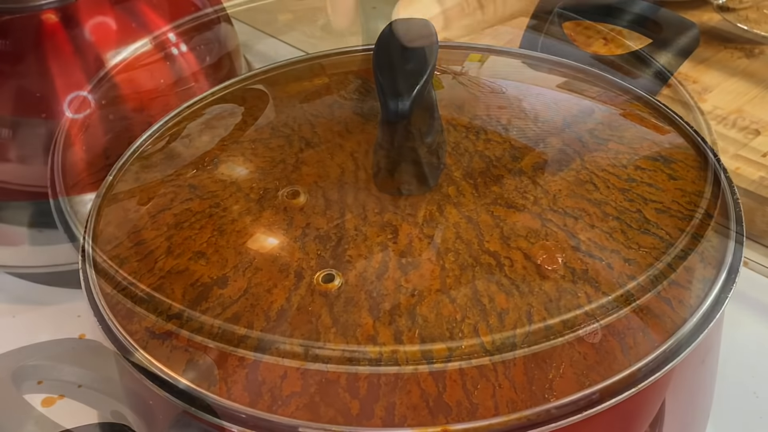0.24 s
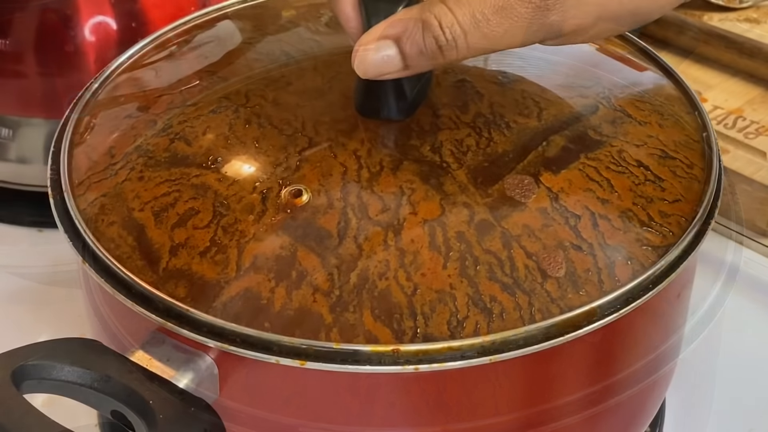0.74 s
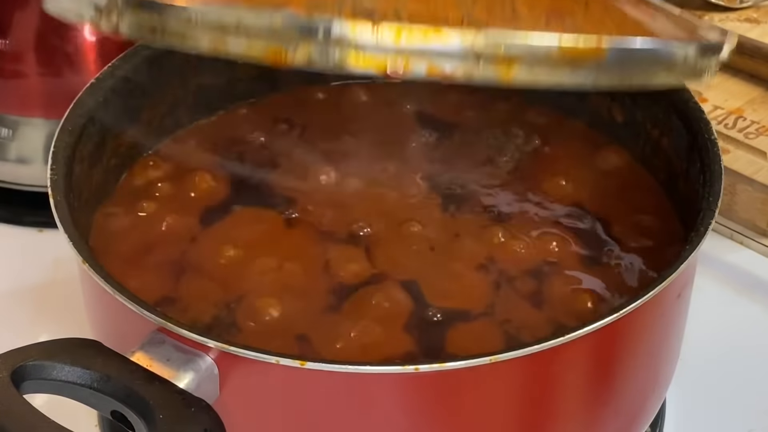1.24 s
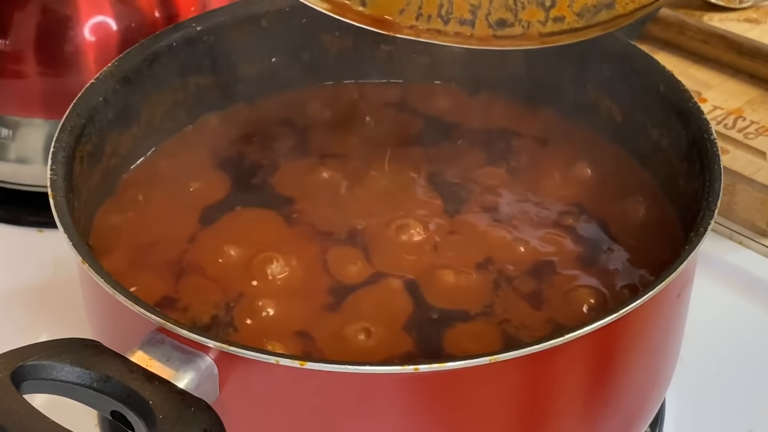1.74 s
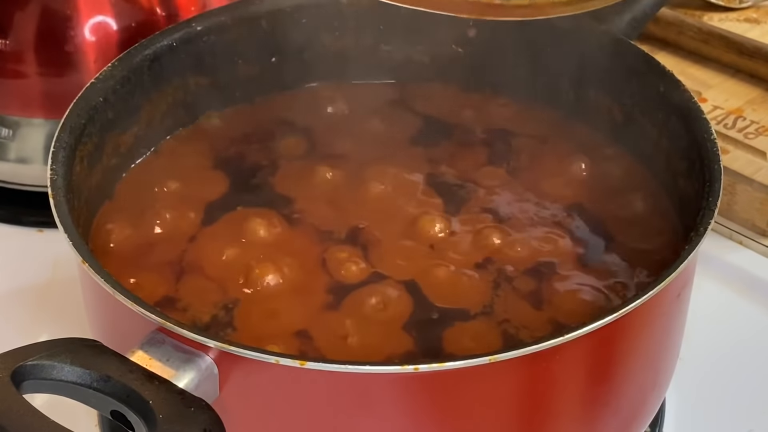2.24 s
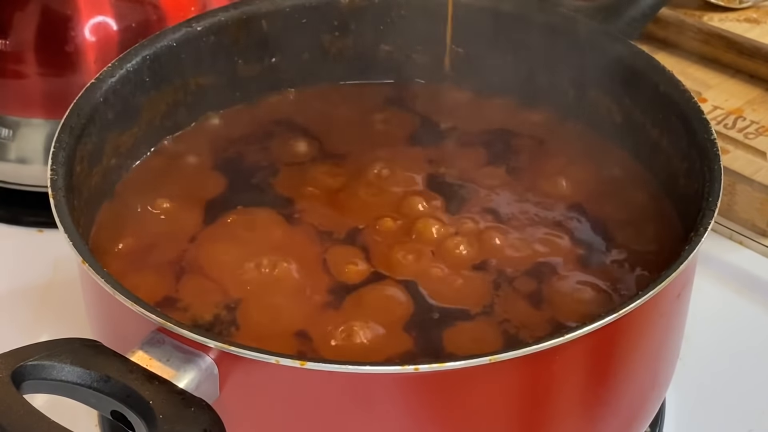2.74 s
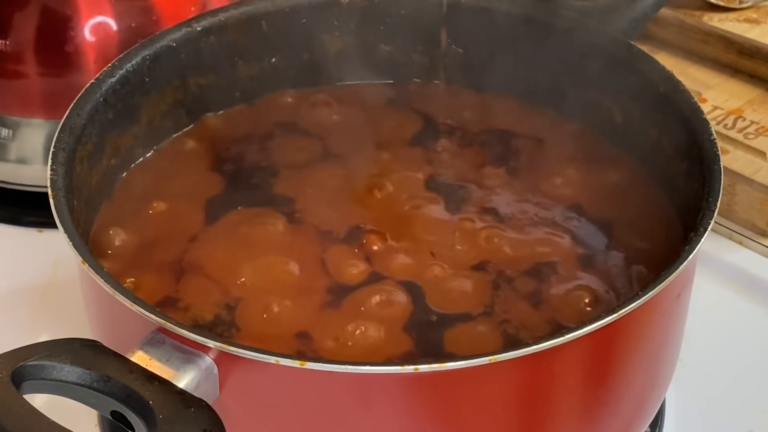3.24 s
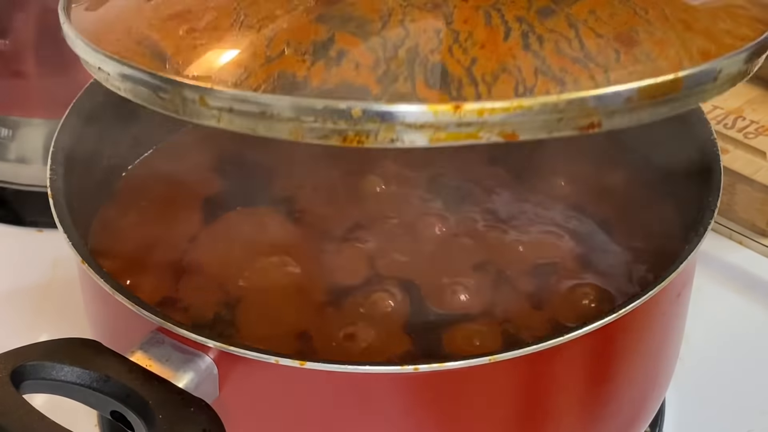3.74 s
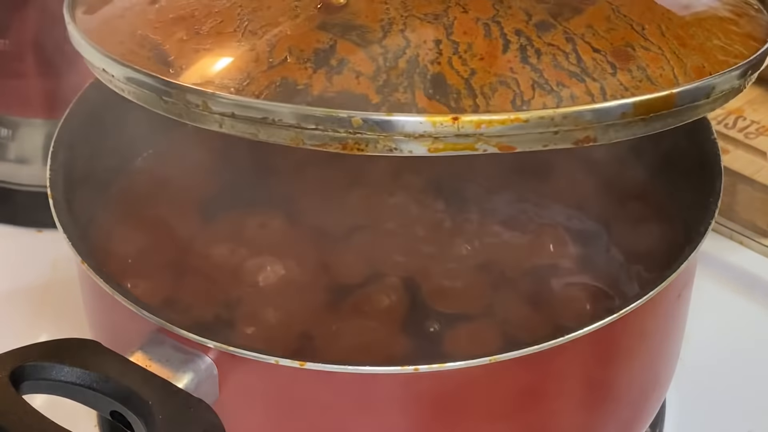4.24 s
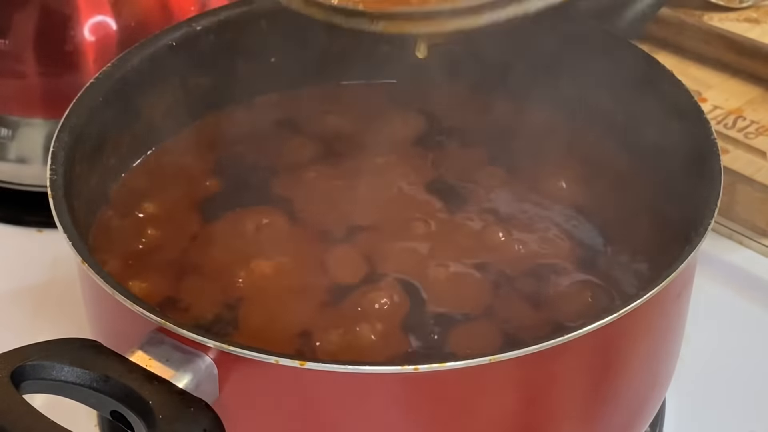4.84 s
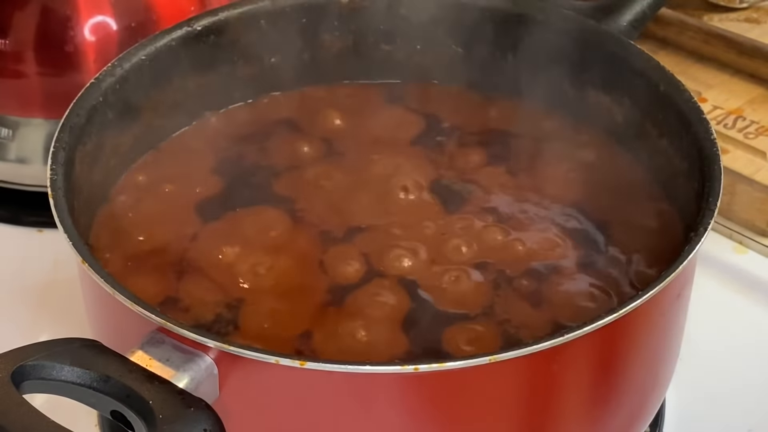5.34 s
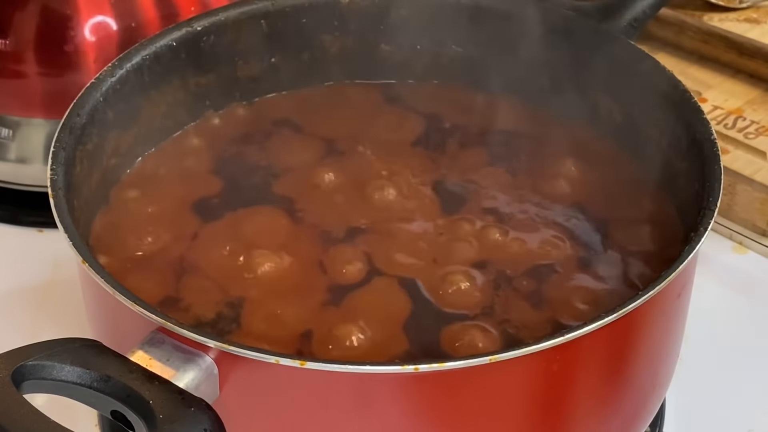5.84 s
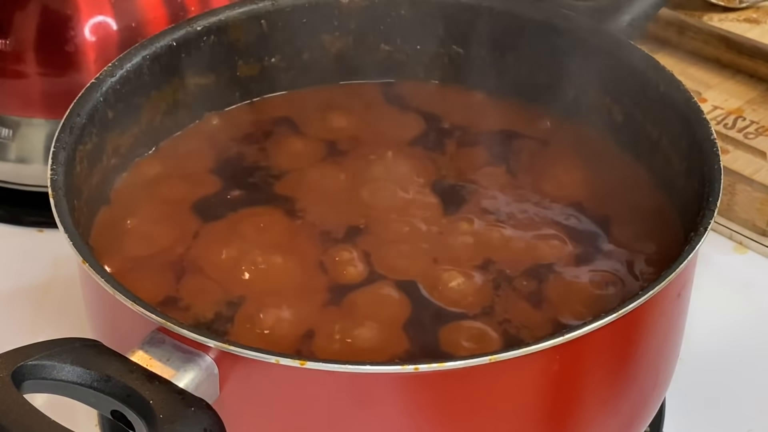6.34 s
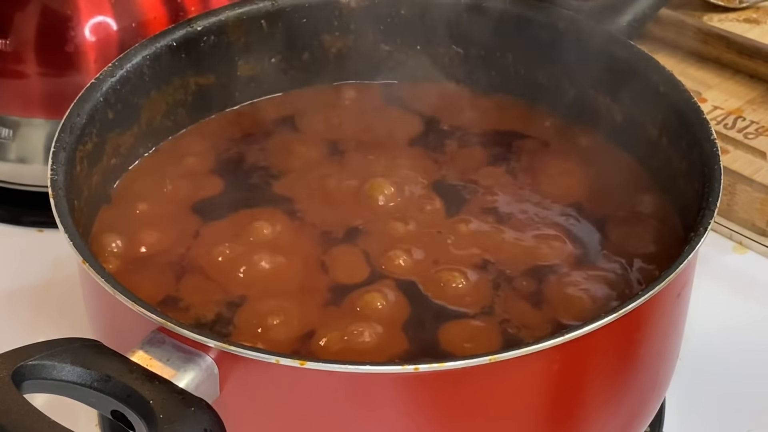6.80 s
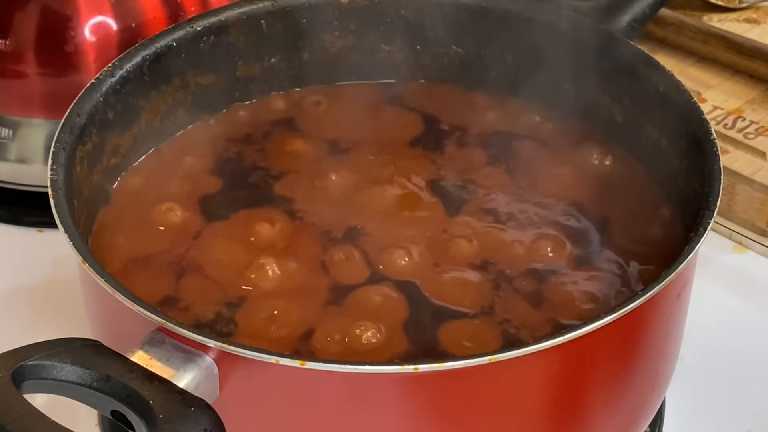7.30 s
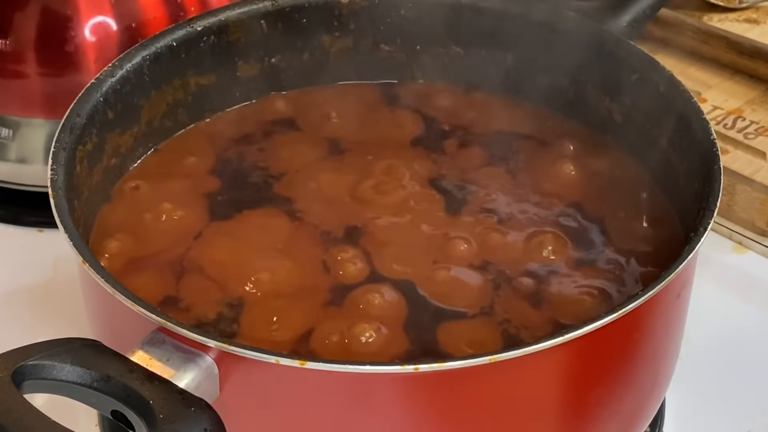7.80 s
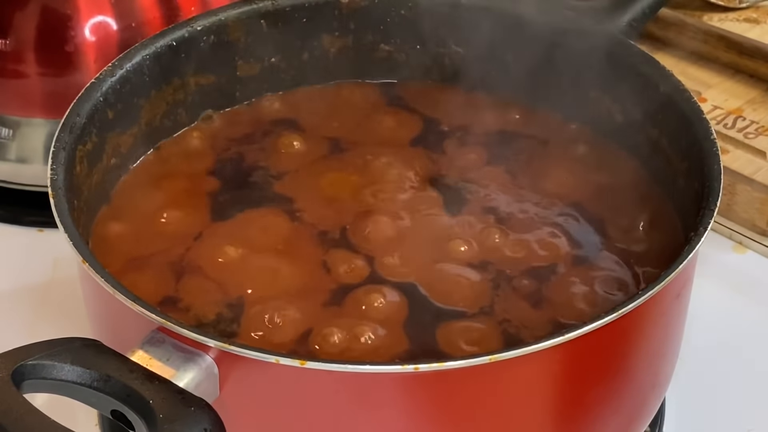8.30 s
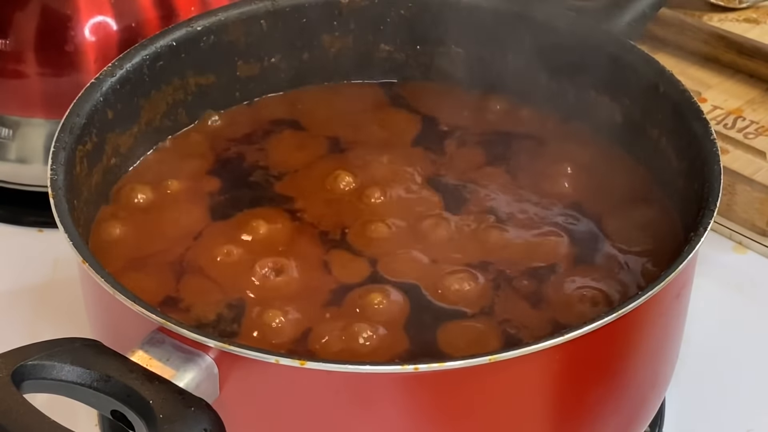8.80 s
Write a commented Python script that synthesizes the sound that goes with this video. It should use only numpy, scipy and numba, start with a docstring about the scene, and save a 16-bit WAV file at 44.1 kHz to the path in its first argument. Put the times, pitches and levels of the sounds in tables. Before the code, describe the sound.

Close stereo phone pickup of thick stew boiling on a stove. First almost only a quiet fan hum and light finger touches, then the lid opens and a bright, wet, spitting fizz appears at once, dotted with loud pops and deeper plops. Farther off, with a little room echo, the glass lid bumps the worktop several times, ending in a loud rattling clatter that stops quickly. Fizzing and popping continue to the end.

```python
"""Kitchen stove: a thick stew boils in a pot, close to a phone with two microphone ports.
A hand lifts the glass lid: the air space under it sings upward and fizz, pops and plops come out.
Later the lid clatters onto the worktop; a fan motor hums all along.
Bubbles are swelling sines of rising pitch, spray and skins noise bursts, bright ticks clicks with
noise, the lid a bank of struck modes, the hand and air filtered noise."""
import sys
import numpy as np
from scipy import signal
from scipy.fft import rfft, irfft
from scipy.io import wavfile
from scipy.ndimage import uniform_filter1d
from numba import njit

SR = 44100
rng = np.random.default_rng(int(sys.argv[2]) if len(sys.argv) > 2 else 0)


def invert_db(x):
    """Field ratio 10**(x/20) for x, a level in decibels (scalar or array-like)."""
    u = np.asarray(x, float) / 20
    return 10 ** u


def output_pcm(signal):
    """Save a mono or channel-first signal as 16-bit PCM at the path in sys.argv[1].

    Samples are clipped to [-1, 1] before scaling.
    """
    pcm = np.clip(np.atleast_2d(signal).T, -1, 1) * 32767
    wavfile.write(sys.argv[1], SR, np.round(pcm).astype(np.int16))


N = 399546
TIME_S = np.arange(N) / SR
BIN_HZ = np.arange(N // 2 + 1) * SR / N

# boil escaping past the lid, shut at first, tipped back over the pot near 4 s: (time [s], fizz level [dB])
BOIL = [(0, -70), (.3, -78), (.96, -85), (1.01, -57), (1.4, -52), (3.4, -52), (4.2, -55), (4.9, -52.5),
        (7.4, -53.5), (8.3, -54), (9.06, -53.5)]
# fizz spectrum: (frequency [Hz], relative level [dB])
FIZZ_TONE = [(1500, -10), (2400, -13), (3000, -8.5), (3600, -3), (4200, -3.5), (5300, 1), (6800, 0),
             (9000, -4.5), (12000, -7), (15000, -19), (16500, -13)]
# loudest small bubbles bursting: (time [s], peak [dB], pitch [Hz])
POPS = [(1.2617, -36, 4820), (1.3391, -39, 5320), (1.4538, -33, 2930), (1.584, -31, 5310),
        (1.7227, -30.5, 3500), (1.7317, -29, 4100), (1.791, -42, 4370), (1.9068, -41, 5310),
        (1.9562, -25, 4270), (2.0125, -33, 4460), (2.0604, -31, 3650), (2.1667, -29.5, 5200),
        (2.263, -28.5, 5160), (2.3069, -36, 5300), (2.3323, -28, 6000), (2.3672, -38, 3840),
        (2.4171, -29.5, 5120), (2.4605, -30, 3640), (2.5782, -32, 5360), (2.6147, -38, 3720),
        (2.7144, -34.5, 3740), (2.7982, -32, 5440), (2.9728, -32, 4900), (3.2308, -39, 5240),
        (3.5271, -30, 5300), (3.5645, -28, 5130), (3.6538, -29, 3430), (3.9367, -30.5, 5250),
        (4.1741, -42, 4580), (4.5278, -33, 7000), (4.5473, -35.5, 3460), (4.7069, -37, 6200),
        (5.0821, -30, 6270), (5.1015, -32.5, 4250), (5.1444, -29.5, 5830), (5.3674, -29.5, 3500),
        (5.9196, -34, 4430), (5.9456, -28, 5530), (5.97, -34, 5240), (6.2714, -40, 5200),
        (6.3008, -35, 4200), (6.4001, -39, 6860), (6.625, -28, 3590), (6.9099, -38, 4140),
        (6.9518, -43, 5680), (7.2501, -46, 5300), (7.4537, -31.5, 5140), (7.5135, -34, 3630),
        (7.8464, -31, 5030), (8.1552, -39, 7290), (8.1796, -34, 6830), (8.4385, -34, 6370),
        (8.6371, -38, 4340), (8.7129, -26, 5600), (8.8596, -38, 4800), (9.0282, -30, 5600)]
# big bubbles breaking through the thick surface: (time [s], peak [dB], pitch [Hz])
PLOPS = [(1.29, -46.5, 1490), (1.453, -45, 2170), (1.502, -40, 1220), (1.58, -50, 1150), (1.689, -50, 930),
         (1.732, -43, 2400), (1.965, -41.5, 2380), (1.988, -48.5, 900), (2.045, -44, 910),
         (2.255, -44, 915), (2.363, -49.5, 920), (2.483, -50, 880), (2.567, -45, 2060), (2.607, -49, 720),
         (2.721, -47.5, 1220), (2.806, -48, 835), (2.93, -46, 1120), (2.978, -47, 1610), (3.0, -46, 1780),
         (3.049, -44, 890), (3.085, -48, 1320), (3.12, -39.5, 1840), (3.166, -42.5, 1290),
         (3.282, -44.5, 1040), (3.464, -48, 2050), (3.514, -42.5, 1960), (3.567, -49, 2080),
         (3.71, -45.5, 1490), (3.896, -48, 1260), (3.937, -42.5, 1900), (4.82, -49, 1630),
         (5.239, -51, 1270), (5.279, -46.5, 1350), (5.355, -48.5, 810), (5.565, -43, 1300),
         (5.714, -49, 1730), (5.928, -52, 930), (5.941, -46, 1180), (6.055, -47, 1170), (6.181, -51, 810),
         (8.1, -45.5, 890), (8.209, -48.5, 1230), (8.342, -43, 1210), (8.423, -42.5, 1310),
         (8.639, -44, 1340), (8.743, -51, 1360)]
# bright ticks and short hisses in the treble: (time [s], peak [dB], level above 12 kHz [dB])
BRIGHT_TICKS = [(1.3523, -48, -55), (1.6082, -42, -64), (1.7315, -41, -42), (1.8983, -46, -66),
                (1.9574, -40, -54), (1.9644, -50, -52), (2.1879, -48, -70), (2.2722, -46, -61),
                (2.7053, -46, -60), (2.7152, -42, -45), (2.7464, -38, -51), (2.798, -40, -48),
                (2.8823, -49, -48), (2.9282, -50, -60), (2.9664, -56, -57), (3.3174, -44, -55),
                (3.5633, -48, -63), (4.5775, -42, -68), (5.4947, -44, -71), (5.6845, -44, -69),
                (6.3061, -45, -60), (6.4457, -51, -53), (6.5728, -39.5, -62), (6.768, -39, -65),
                (6.7865, -47, -67), (7.0314, -48, -57), (7.1711, -44, -72), (7.2502, -38, -56),
                (8.0087, -45, -67), (8.1165, -43, -50), (8.357, -42.5, -72), (8.3993, -43, -65),
                (8.522, -48, -59), (8.8059, -46, -62), (9.0004, -45, -71)]
# spectrum of spray and bright ticks: (frequency [Hz], relative level [dB])
SPRAY_TONE = [(2000, -48), (4000, -39), (6000, 4), (9000, 7), (12000, -2.5), (15000, 2), (16500, -5)]
# lid meeting the worktop: (time [s], ring drive [dB], thud drive [dB], chatter t60 [s])
KNOCKS = [(5.625, -39, -54, 0.34), (6.314, -29.5, -28, 0.3), (6.357, -30.5, -29, 0.36),
          (6.405, -44, -31.5, 0.18), (6.477, -35, -31, 0.12), (6.518, -22.5, -26, 0.32),
          (6.535, -30, -29.5, 0.27), (6.617, -27, -32.5, 0.49), (6.863, -49, -43.5, 0.49),
          (6.952, -37.5, -44, 0.11), (6.974, -21.5, -30.5, 0.34), (7.409, -37, -30, 0.26),
          (7.566, -13, -18.5, 0.49), (7.577, -16.5, -13.5, .2), (7.625, -9, -28, 0.22),
          (7.655, -13.5, -28, .2), (7.676, -14.5, -24, 0.31), (7.707, -14, -27.5, 0.19),
          (7.732, -18, -21.5, 0.32), (7.993, -29, -53, 0.063)]
# modes of the lid: (frequency [Hz], relative level [dB], t60 [s])
LID_MODES = [(74.7, 4, 0.64), (98.2, -1.5, 0.23), (188.5, 1, 0.77), (263, 1.5, 0.26), (312, -13.5, 0.39),
             (380, 5.5, 0.091), (444, -1.5, 0.14), (470, -2, 0.17), (558, 6, 0.035), (625, -2.5, 0.26),
             (859, -11, 0.26), (954, -5, 0.17), (1053, -10, 0.14), (1355, -9, 0.2), (1440, -17, 0.17),
             (1558, -13, 0.15), (1810, 0, 0.029), (1810, -28, 0.21), (1996, -8, 0.054)]
# worktop response: (frequency [Hz], relative level [dB])
WORKTOP_TONE = [(25, -48), (45, 6), (65, -3), (190, 3), (480, -15.5), (780, -14.5), (1000, -10),
                (1250, -17), (1500, -13), (2200, -22), (3000, -26), (16000, -81)]
# spectrum of the lid's ticks and scratches: (frequency [Hz], relative level [dB])
SCRATCH_TONE = [(1500, -30), (2500, -7.5), (3600, 5.5), (6000, 2.5), (9000, -5), (12000, -11.5),
                (16000, -11)]
# fingers closing on the lid knob: (time [s], rustle drive [dB], tap drive [dB], t60 [s])
TOUCHES = [(0.4526, -52.5, -58, 0.12), (0.551, -50.5, -58, 0.056), (0.673, -40, -61.5, 0.023),
           (0.695, -48.5, -55, 0.11), (0.7632, -48, -70, 0.033), (0.793, -51, -58, 0.16),
           (0.8774, -48, -70, 0.11), (0.9204, -56, -64, 0.13)]
# spectrum of the touches: (frequency [Hz], relative level [dB])
KNOB_TONE = [(300, 4), (800, 6.5), (2000, -2), (4000, 5.5), (8000, -3.5), (12000, -12), (16000, -18)]
# air space under the rising lid: (time [s], pitch [Hz], level [dB])
GAP = [(.82, 170, -75), (.92, 190, -58), (1.0, 320, -59), (1.1, 520, -62), (1.2, 620, -64),
       (1.35, 700, -75)]
# fan and simmer: (time [s], rumble drive [dB], rush drive [dB])
AIR = [(0.06, -61, -57.5), (0.35, -62.5, -60.5), (0.7, -59.5, -64), (1.6, -58, -60), (9.06, -57, -58.5)]
# spectrum of the fan noise: (frequency [Hz], relative level [dB])
KITCHEN_TONE = [(18, -34), (30, -9), (70, -0.5), (124, -1), (194, -0.5), (425, -10), (704, -13.5),
                (1060, -26.5), (1300, -23), (1760, -22.5), (2600, -29), (3380, -47), (5720, -120)]
# air and microphone hiss: (frequency [Hz], relative level [dB])
HISS_TONE = [(2600, -89), (6000, -92.5), (10000, -102), (15000, -102)]
# motor lines: (frequency [Hz], nominal width [Hz], level relative to the rumble drive [dB])
MOTOR_LINES = [(62.2, 7.2, -1), (117, 7.2, -9), (181.1, 10.3, -9.5), (226, 13, -11.5), (722, 3.5, -26.5),
               (1471, 2.3, -22), (1596, 2.7, -25.5)]
# microphone ports: (frequency [Hz], phase by which left leads [rad])
PORTS = [(0, 0), (1030, -0.0), (1810, -0.3), (3530, 0.6), (6800, -0.2), (8100, -2.0), (9730, -6.2),
         (10400, -6.3), (11600, -9.3), (12700, -9.7), (13300, -12.3), (14400, -12.6), (15200, -15.3),
         (16100, -15.7)]
# gain of the side signal: (frequency [Hz], gain [dB])
WIDTH = [(60, -24), (110, -14), (200, -14), (380, -6), (700, -5), (1290, -0.5), (2000, -6.5), (2600, -13),
         (6000, -12), (9000, 1), (16000, -5)]

# spray gain under the fizz, its slow wander, its constant leak
SPRAY_DB, SPRAY_WANDER_DB, SPRAY_LEAK_DB = -20.5, 2.5, -88.5
POP_CYCLES, POP_SHORTER_PER_DB = 1.21, 0.23  # swell of a -35.5 dB pop; louder ones burst faster
PLOP_CYCLES, PLOP_RISE = 1.68, 0.09
RUMBLE_DB, BODY_DB = -9, -2.5  # chatter relative to the thud drive
BRIGHT_DB, SCRATCH_DB, TICK_DB = -13, -29, -15.5  # relative to the ring drive
RUMBLE_LONGER, SETTLE_S = 1.22, 0.012  # worktop shakes longer than the rim; weight takes time to settle
GRIP_S, GRIP_TAKES_S = 7.99, 0.1
RUSH_WANDER_DB = 1.9
ROOM_T60_S, ROOM_DAMP_HZ, ROOM_DB = 0.3, 2440, -9.5


def level(x, db):
    """Set the rms level."""
    return x * invert_db(db) / np.sqrt(np.mean(x ** 2))


def shape(points):
    """Gain of (frequency [Hz], level [dB]) points on every bin."""
    hz, db = np.transpose(points)
    return invert_db(np.interp(np.log(BIN_HZ + 1), np.log(hz), db))


def colour(x, points):
    """Causal minimum-phase filter through the points, from the folded cepstrum."""
    cepstrum = irfft(np.log(shape(points)), N)
    cepstrum[1:N // 2] *= 2
    cepstrum[N // 2 + 1:] = 0
    return irfft(rfft(x) * np.exp(rfft(cepstrum)), N)


def below(x, hz):
    """Second-order low-pass."""
    return signal.sosfilt(signal.butter(2, hz, fs=SR, output="sos"), x)


def clicks(s, size):
    """Single-sample impulses."""
    return np.bincount((np.asarray(s) * SR).astype(int), size, N)[:N]


def bursts(s, db, t60_s):
    """Short crunches: noise that starts at once and decays by 60 dB in t60_s."""
    fall = signal.lfilter([1], [1, -invert_db(-60 / (t60_s * SR))], clicks(s, invert_db(db)))
    return fall * rng.standard_normal(N)


def random_bursts(count, mean_db, span, t60_s):
    """Crunches at random times, a few much louder than the rest."""
    u = rng.random((count, 2)).T
    return bursts(u[0] * N / SR, -mean_db * np.log(1 - span * u[1]), t60_s)


def walk(rate_hz):
    """Random levels held 1 / rate_hz and slewed twice; spread near 1."""
    hold = int(SR / rate_hz)
    steps = np.repeat(rng.standard_normal(N // hold + 1), hold)
    return 0.73 * uniform_filter1d(uniform_filter1d(steps, hold), hold)[:N]


def ring(x, hz, t60_s):
    """One decaying mode: a complex one-pole resonator."""
    pole = np.exp(2j * np.pi * hz / SR - np.log(1000) / (t60_s * SR))
    return signal.lfilter([1], [1, -pole], x).imag


@njit
def moving_bandpass(x, hz, width_hz):
    """State-variable band-pass whose centre may move every sample."""
    y, band, low = np.empty(len(x)), 0., 0.
    for i in range(len(x)):
        g, k = np.tan(np.pi * hz[i] / SR), width_hz[i] / hz[i]
        v = (band + g * (x[i] - low)) / (1 + g * (g + k))
        band, low, y[i] = 2 * v - band, low + 2 * g * v, k * v
    return y


@njit
def bubbles(s, hz, size, cycles, rise, n):
    """Each bubble swells and dies as t exp(-t) over some cycles while its pitch rises."""
    out = np.zeros(n)
    for e in range(len(s)):
        tau, start, phase = cycles[e] / hz[e] * SR, int(s[e] * SR), 0.
        for i in range(min(int(8 * tau), n - start)):
            u = i / tau
            phase += 2 * np.pi * hz[e] * (1 + rise * (u - 1)) / SR
            out[start + i] += size[e] * u * np.exp(1 - u) * np.sin(phase)
    return out


def swarm(count, lo_hz, hi_hz, spread_db, cycles, rise):
    """Bubbles at random times, pitches and sizes; a few are much louder than the rest."""
    u = rng.random((count, 4)).T
    size = invert_db(-spread_db * np.log(1 - .985 * u[2]))
    hz = lo_hz * (hi_hz / lo_hz) ** u[1]
    return bubbles(u[0] * N / SR, hz, size, cycles * (.5 + u[3]), rise, N)


def single_bubbles(rows, cycles, rise):
    """Loud bubbles, one per row; cycles is a function of peak level."""
    s, db, hz = np.array(rows, float).T.copy()
    return bubbles(s, hz, invert_db(db), cycles(db), rise, N)


def fizz():
    """Tiny bubbles in flurries, with thin skins tearing in a pitchless crackle."""
    tiny = swarm(count=50000, lo_hz=2486, hi_hz=8530, spread_db=6.5, cycles=1.84, rise=0.067)
    skins = random_bursts(2000, 4.0, .98, 0.012)
    mixed = level(tiny, 0) + level(skins, -6.0)
    flurries = invert_db(3.2 * walk(40) + 0.8 * walk(8.6))
    return level(colour(mixed, FIZZ_TONE) * flurries, 0)


def spray(fizz_db):
    """Fine spray as noise bursts that follow the fizz with a slow wander, over a constant leak."""
    drops = level(colour(random_bursts(3000, 4.5, .995, 0.017), SPRAY_TONE), 4.5)
    return drops * (invert_db(fizz_db + SPRAY_DB + SPRAY_WANDER_DB * walk(8.7)) + invert_db(SPRAY_LEAK_DB))


def bright_ticks():
    """Bright ticks and short hisses in the treble, clicks plus noise, level set separately above 12 kHz."""
    s, db, top_db = np.transpose(BRIGHT_TICKS)

    def crack(peak_db):
        return rfft(colour(clicks(s, invert_db(peak_db)) + bursts(s, peak_db - 13.5, 0.016), SPRAY_TONE))

    return irfft(np.where(BIN_HZ < 12000, invert_db(12) * crack(db), invert_db(25) * crack(top_db)), N)


def stew():
    """Fizz and low blubber let out past the lid, spray, bright ticks and the loud single bubbles."""
    fizz_db = np.interp(TIME_S, *np.transpose(BOIL))
    blubber = swarm(count=2000, lo_hz=716, hi_hz=2484, spread_db=4.5, cycles=1.85, rise=0.089)
    boil = invert_db(fizz_db) * (fizz() + level(blubber, -12.5))
    pops = single_bubbles(
        POPS, lambda db: np.maximum(POP_CYCLES - POP_SHORTER_PER_DB * (db + 35.5), .5), 0.0076)
    plops = single_bubbles(PLOPS, lambda db: np.full(len(db), PLOP_CYCLES), PLOP_RISE)
    return boil + spray(fizz_db) + bright_ticks() + pops + plops


def lid():
    """Blows and chatter drive one body: soft pushes reach the worktop, hard contact rings glass and rim."""
    s, ring_db, thud_db, t60_s = np.transpose(KNOCKS)
    after_s = np.maximum(TIME_S - s[:, None], 0)

    def chatter(db, t60_s, rise_s):
        # powers of all blows add
        fall = invert_db(-120 * after_s / t60_s[:, None])
        return np.sqrt(invert_db(2 * db) @ (fall * np.minimum(after_s / rise_s, 1) ** 2))

    rumble = chatter(thud_db + RUMBLE_DB, RUMBLE_LONGER * t60_s, SETTLE_S)
    body = chatter(thud_db + BODY_DB, t60_s, SETTLE_S)
    bright = chatter(ring_db, t60_s, 0.0027)
    grit = level(rng.standard_normal(N) * invert_db(2.24 * rng.exponential(size=N) + 1.15 * walk(80)), 0)

    # the weight lands a moment after the rim first touches
    thuds = clicks(s + 0.00803, invert_db(thud_db + 22))
    blows = clicks(s, invert_db(ring_db + 11)) + bursts(s, ring_db + 0.5, 0.023)
    push = rumble * grit + thuds
    press = body * grit + thuds
    contact = invert_db(BRIGHT_DB) * bright * grit + blows
    # push at the bottom, press up to about 700 Hz, contact above
    force = contact + below(press - contact, 700) + below(push - press, 250)

    # a hand steadies the lid and stops its ring
    free = 1 - np.clip((TIME_S - GRIP_S) / GRIP_TAKES_S, 0, 1)
    modes = free * sum((-1) ** k * invert_db(db - 37.5) * ring(force, hz, t)
                       for k, (hz, db, t) in enumerate(LID_MODES))
    worktop = invert_db(17.5) * colour(force, WORKTOP_TONE)
    scratch = invert_db(SCRATCH_DB) * bright * grit
    return modes + worktop + colour(bursts(s, ring_db + TICK_DB, 0.015) + scratch, SCRATCH_TONE)


def touch():
    """Rustles and taps on the knob: decaying noise, split near 2500 Hz."""
    def fall(s, t60_s):
        return (TIME_S >= s) * invert_db(-60 * np.maximum(TIME_S - s, 0) / t60_s)

    rustle = sum(invert_db(db) * fall(s, t60_s) for s, db, _, t60_s in TOUCHES)
    tap = sum(invert_db(db) * fall(s, 1.14 * t60_s) for s, _, db, t60_s in TOUCHES)  # taps last a little longer
    noise = colour(rng.standard_normal(N), KNOB_TONE)
    low = below(noise, 2500)
    return rustle * level(noise - low, -4.0) + tap * level(low, 1.5)


def air_space():
    """The pot's air space as a noise band that rises in pitch as the gap under the lid widens."""
    s, hz, db = np.transpose(GAP)
    hz = np.interp(TIME_S, s, hz)
    width_hz = .3 * hz
    # divide by the band's noise gain: unit rms at any pitch
    hollow = moving_bandpass(rng.standard_normal(N), hz, width_hz) / np.sqrt(np.pi * width_hz / SR)
    return hollow * invert_db(np.interp(TIME_S, s, db, -120, -120))


def kitchen():
    """Fan noise in bands that waver independently, motor lines and smooth hiss; mid and side."""
    s, rumble_db, rush_db = np.transpose(AIR)
    rumble = invert_db(np.interp(TIME_S, s, rumble_db) + 0.95 * walk(3.08))
    rush = invert_db(np.interp(TIME_S, s, rush_db) + RUSH_WANDER_DB * walk(3.86))
    out = []
    for _ in ("mid", "side"):
        noise = rfft(rng.standard_normal(N)) * shape(KITCHEN_TONE)
        bands = []
        for hz in 40 * 2. ** np.arange(7):
            window = np.exp(-np.log2((BIN_HZ + 1) / hz) ** 2 / .5)
            bands.append(irfft(noise * window, N) * invert_db(0.99 * walk(3.2)))
        lines = sum(level(ring(rng.standard_normal(N), hz, 3.2 / width_hz), db)
                    for hz, width_hz, db in MOTOR_LINES)
        hiss = irfft(rfft(rng.standard_normal(N)) * shape(HISS_TONE) * (BIN_HZ > 2000), N) * invert_db(25)
        low = (level(sum(bands[:4]), -3.5) + lines) * rumble
        out.append(low + level(sum(bands[4:]), -5.5) * rush + hiss)
    return out


def room(x):
    """Two unrelated tails (mid, side); treble dies sooner, and the mid tail is thinned below 700 Hz."""
    t = TIME_S[:SR]
    noise = rng.standard_normal((2, SR)) * invert_db(-60 * t / ROOM_T60_S) * (t > .002)
    dull = signal.lfilter(*signal.butter(1, ROOM_DAMP_HZ, fs=SR), noise)
    tails = dull + (noise - dull) * invert_db(-60 * t / 0.1)
    tails[0] = signal.lfilter(*signal.butter(2, 700, "high", fs=SR), tails[0])
    return signal.fftconvolve(x[None], tails / np.sqrt(np.sum(tails[1] ** 2)), axes=1)[:, :N]


def scene():
    """Near sources almost dry, the lid further off and wetter; the ports shift the treble in phase."""
    near, far = stew() + touch() + air_space(), lid()
    wet, wide = room(invert_db(ROOM_DB) * near + invert_db(-1) * far)
    air, air_wide = kitchen()
    mid = rfft(near + far + invert_db(-2.5) * wet + air)
    side = rfft(invert_db(-3.5) * wide + air_wide) * shape(WIDTH)
    turn = np.exp(.5j * np.interp(BIN_HZ, *np.transpose(PORTS)))  # half the lead on each port
    return irfft(np.array([(mid + side) * turn, (mid - side) / turn]), N)


def top_cut(x):
    """Nothing passes above the cut-off."""
    return signal.sosfilt(signal.butter(12, 16510, fs=SR, output="sos"), x)


def record(dry):
    """The phone takes the stereo mix with no further filter or gain."""
    return top_cut(dry)


dry = scene()
out = record(dry)
output_pcm(out)
```